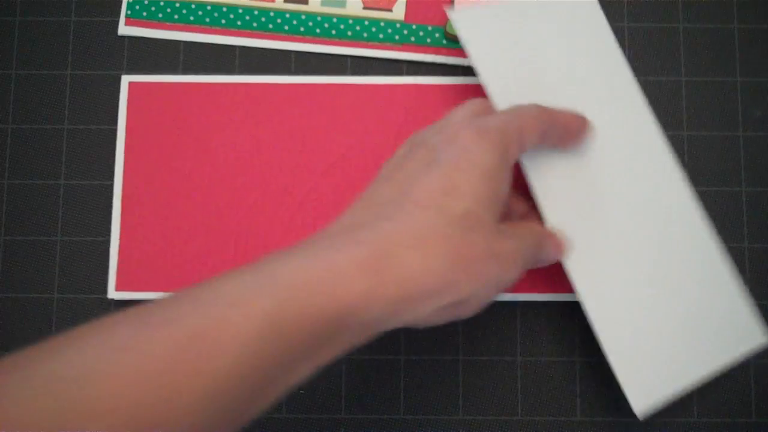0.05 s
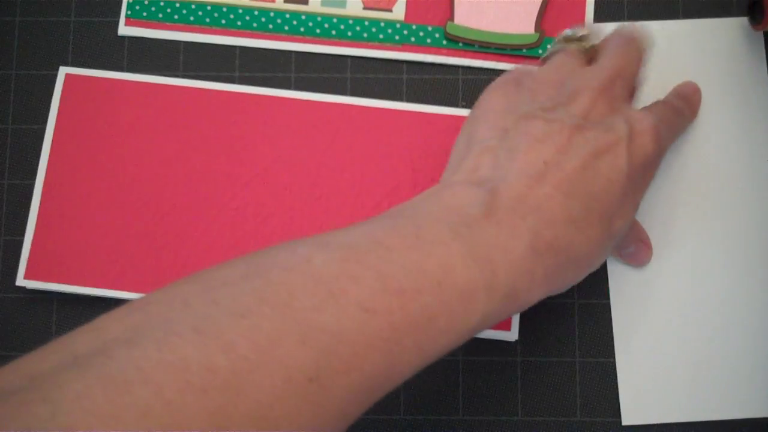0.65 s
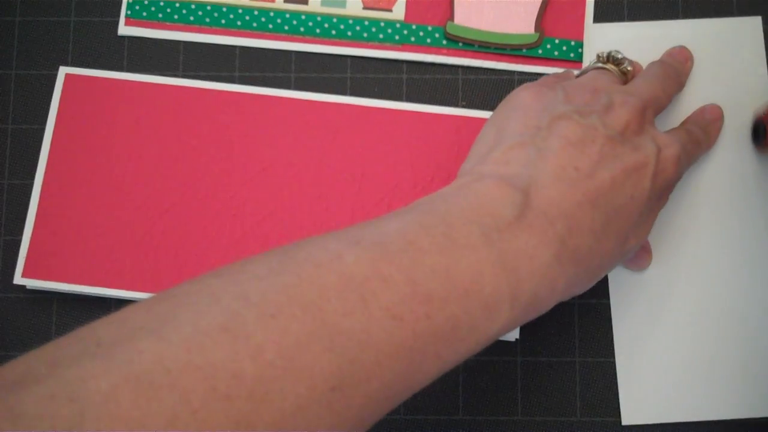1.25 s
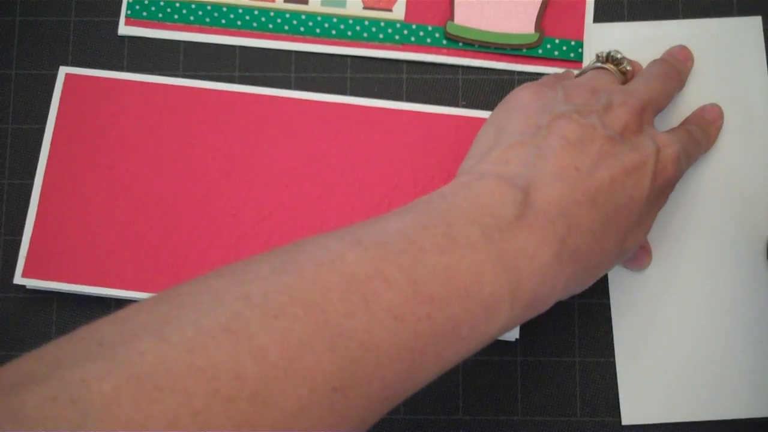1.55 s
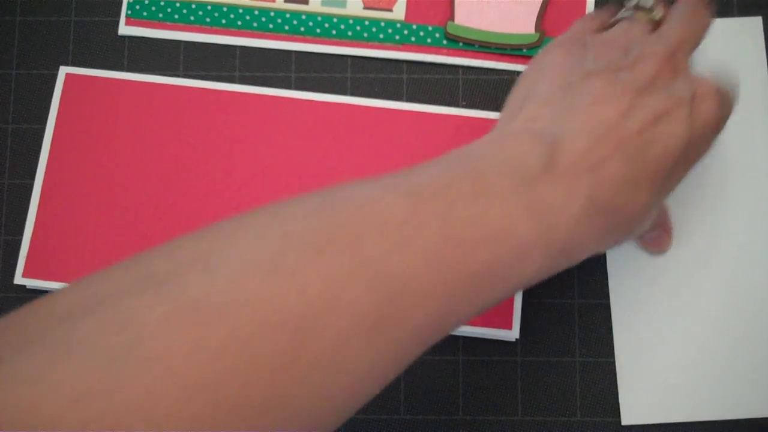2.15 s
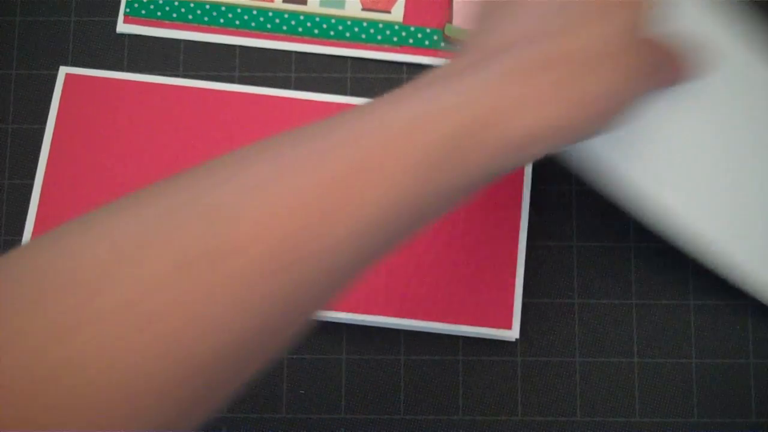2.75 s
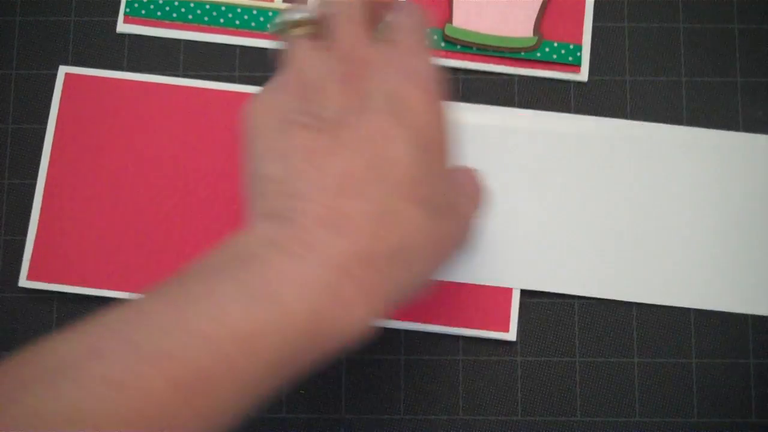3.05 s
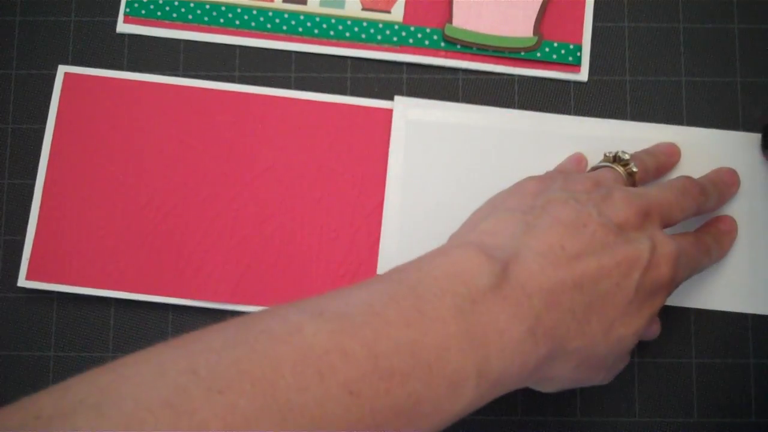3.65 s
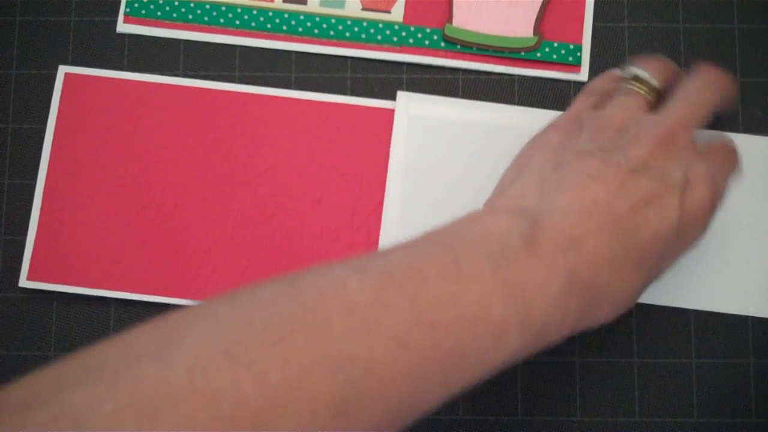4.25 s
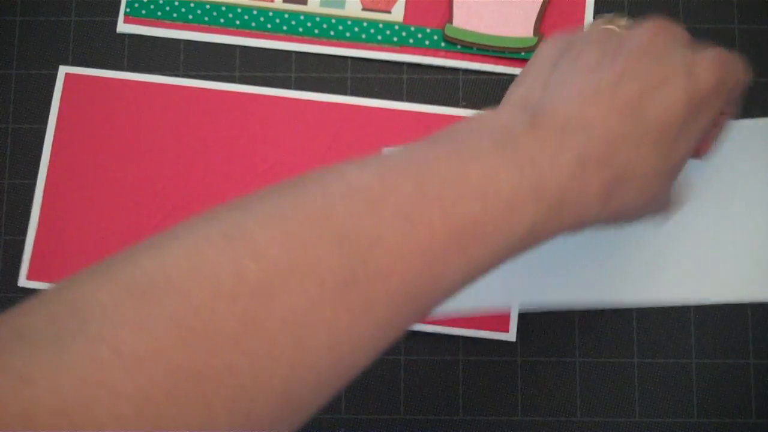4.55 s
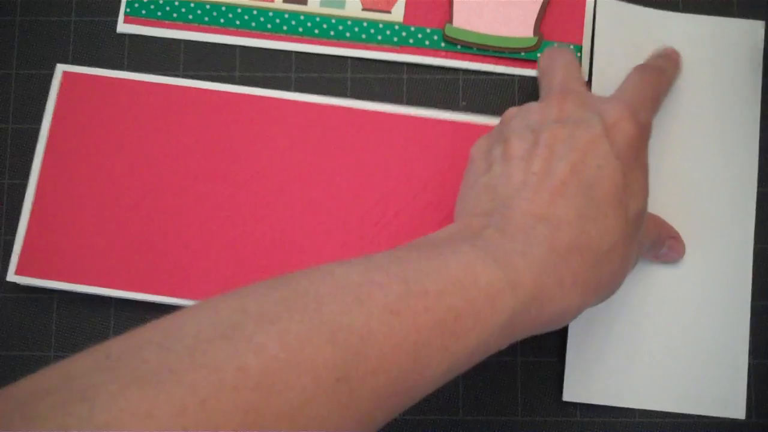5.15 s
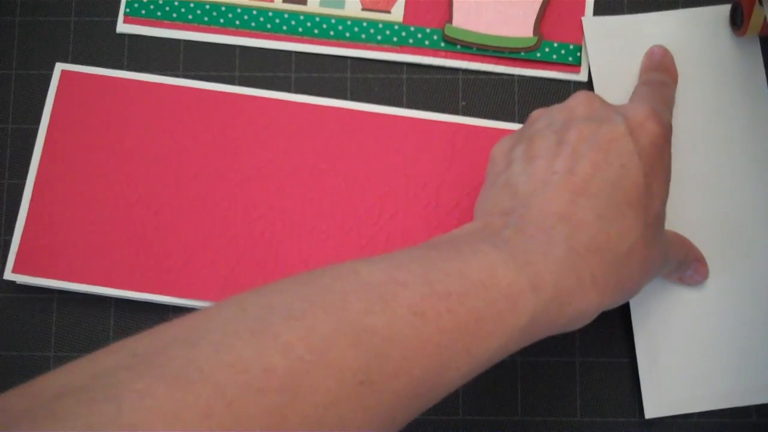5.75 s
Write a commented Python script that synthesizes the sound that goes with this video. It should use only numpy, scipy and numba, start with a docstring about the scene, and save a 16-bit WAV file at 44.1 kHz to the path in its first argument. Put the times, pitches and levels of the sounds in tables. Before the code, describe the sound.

A sheet of paper slides onto a card with a bright hiss and a sharp snap. Fingers rub it down with a dull, grainy scrub. The sheet swishes to a new position, is rubbed again, snaps loudly and is nudged along. Small crinkles and soft fingertip bumps on the table come in between. The sound is close and slightly to the right, in a small, quiet room.

```python
"""First comes the hiss of a sheet of paper sliding onto a card, with a sharp snap.
Fingers rub it down, it is moved, rubbed again and nudged along. The sheet hisses over a thin air gap and
buckles; skin catches and slips on it, and fingertips bump the craft table through it.
We listen in a small room, close to the table, through a pair of microphone ports, each with its own
treble resonance. The sheet lies to the right."""
import sys
import numpy as np
from scipy import signal
from scipy.fft import rfft, irfft
from scipy.io import wavfile
from numba import njit

SR = 44100
rng = np.random.default_rng(int(sys.argv[2]) if len(sys.argv) > 2 else 0)


def dump_mix(stems):
    """Bounce the given channels to the path in sys.argv[1] as a 16-bit WAV at rate SR."""
    frames = np.atleast_2d(stems).T  # one column per channel
    limited = np.clip(frames, -1, 1)  # hard clip at full scale
    pcm = np.round(limited * 32767).astype(np.int16)
    wavfile.write(sys.argv[1], SR, pcm)


N = 256220
T = np.arange(N) / SR


def undb(db):
    """Decibels to gain."""
    return 10 ** (np.asarray(db) / 20)


def unit(x):
    """Scale to rms 1."""
    return x / np.sqrt(np.mean(x ** 2))


def decay(t, t60):
    """A fade that loses 60 dB in t60."""
    return np.exp(-np.log(1000) * t / t60)


def walk(rate):
    """Smooth chance with spread 1 that changes about rate times a second."""
    return unit(np.interp(T * rate, np.arange(N), rng.standard_normal(N)))


def colour(x, points, size=4096):
    """Causal filter through (Hz, dB) points."""
    hz, db = np.transpose(points)
    f = np.maximum(np.fft.rfftfreq(size, 1 / SR), 1)
    cepstrum = irfft(np.log(undb(np.interp(np.log(f), np.log(hz), db))))
    cepstrum[1:size // 2] *= 2  # fold to minimum phase
    cepstrum[size // 2 + 1:] = 0
    response = irfft(np.exp(rfft(cepstrum)))
    return signal.fftconvolve(x, response[None], axes=1)[:, :x.shape[1]]


def wide(pair, half_hz):
    """Two unrelated signals become a broad source: alike at both ports in the bass, unlike higher up."""
    f = np.fft.rfftfreq(pair.shape[1], 1 / SR)
    angle = np.pi / 4 * f / (f + half_hz)
    mid, side = rfft(pair) * np.array([np.cos(angle), np.sin(angle)])
    return irfft(np.array([mid + side, mid - side]), pair.shape[1])


@njit
def resonance(x, hz, width_hz):
    """Moving state-variable filter: returns its band-pass and high-pass outputs."""
    band, high = np.empty_like(x), np.empty_like(x)
    for c in range(len(x)):
        band_state, low_state = 0., 0.
        for i in range(x.shape[1]):
            g, damping = np.tan(np.pi * hz[i] / SR), width_hz[i] / hz[i]
            v = (band_state + g * (x[c, i] - low_state)) / (1 + g * (g + damping))
            low = low_state + g * v
            band[c, i], high[c, i] = damping * v, x[c, i] - damping * v - low
            band_state, low_state = 2 * v - band_state, 2 * low - low_state
    return band, high


def friction(rate, scatter_db, smooth_db):
    """Fibres catch and let go: tiny slips of unequal size over a bed of countless smaller ones."""
    slips = (rng.random(N) < rate / SR) * undb(scatter_db * np.minimum(rng.exponential(size=N), 4))
    grain = unit(slips * rng.standard_normal((2, N)))
    return unit(grain + undb(smooth_db) * rng.standard_normal((2, N)))


def swell(peak_s, rise_s, fall_s, db, drop_db=12, shape=1.69):
    """Power of one hand movement: drop_db down one rise before and one fall after its peak."""
    away = np.abs(T - peak_s) / np.where(T < peak_s, rise_s, fall_s)
    return undb(db - np.minimum(drop_db * away ** shape, 200)) ** 2


# Room air and microphone hiss. Each row: frequency in Hz, relative level in dB.
AIR_SPECTRUM = [(25, -17), (90, -20), (120, -12), (190, -12.5), (500, -10), (700, -14), (900, -14),
                (1800, -16), (6200, -16.5), (10000, -21), (14000, -21.5)]

def room_tone(air_db=-58, whine_hz=580, whine_db=-74, rumble_db=-76):
    """The still room: air, microphone hiss, a faint steady whine and each port's own low rumble."""
    air = unit(colour(wide(rng.standard_normal((2, N)), half_hz=250), AIR_SPECTRUM))
    whine = np.sqrt(2) * np.sin(2 * np.pi * whine_hz * T + 0.62 * walk(rate=9.1))
    rumble_spectrum = [(25, -23), (70, -6.5), (150, -14), (400, -19), (2000, -62)]
    rumble = unit(colour(rng.standard_normal((2, N)), rumble_spectrum))
    return undb(air_db) * air + undb(whine_db) * whine + undb(rumble_db) * rumble


def small_room(x, early_db=-13, early_t60=0.065, late_db=-15, late_t60=0.32, first_s=0.00222):
    """Things on the table answer at once; the room adds a short tail. Both are duller than the source."""
    t = T[:SR // 2]
    response = 0
    for db, t60 in ((early_db, early_t60), (late_db, late_t60)):
        echoes = rng.standard_normal((2, len(t))) * decay(t, t60) * (t > first_s)
        response = response + undb(db) * echoes / np.sqrt(np.sum(echoes ** 2) / 2)
    echo_spectrum = [(100, 5), (600, 9.5), (2000, 2.5), (7000, -5.5), (14000, 0)]
    response = colour(wide(response, half_hz=2000), echo_spectrum)
    return x + signal.fftconvolve(x, response, axes=1)[:, :N]


# The left and right microphone ports. Each row: frequency in Hz, gain in dB.
LEFT_RESPONSE = [(100, 4.5), (1200, -1), (4000, 1), (5900, 4), (7250, 11), (8500, 4.5), (10000, 2.5),
                 (14000, -3.5)]
RIGHT_RESPONSE = [(100, 5), (1200, 0), (4200, 1), (6050, 12), (7000, 1.5), (8000, -3.5), (10000, -7),
                  (14000, -22)]

def microphone_ports(x, lag_ms=0.069):
    """Each port rings at its own treble pitch; the left, farther from the sheet, hears it later."""
    delay = np.exp(-2j * np.pi * np.fft.rfftfreq(N, 1000 / SR) * lag_ms)
    left = irfft(rfft(x[:1]) * delay, N)
    return np.vstack([colour(left, LEFT_RESPONSE), colour(x[1:], RIGHT_RESPONSE)])


# The table with its mat. Each row: mode frequency in Hz, relative level in dB, t60 in seconds.
TABLE_MODES = [(54.3, -30, .07), (112.1, -24, 0.16), (252, -18, 0.17), (326, -11.5, 0.12),
               (438, -14.5, 0.18), (603, -16, 0.091), (713, -7, 0.13), (808, -7.5, 0.15),
               (1221.5, -5.5, 0.054)]
# Its many damped modes, heard as a thud. Each row: frequency in Hz, relative level in dB.
THUD_SPECTRUM = [(40, -21), (100, -13.5), (200, -8), (330, -6), (700, -3.5), (1400, -6.5), (3000, -15),
                 (8000, -47)]
# Fingers landing. Each row: start in seconds, relative tap level in dB, contact time in ms,
# relative level of the following weight in dB.
LANDINGS = [(.166, -39.5, 0.85, -56), (.984, -37.5, 0.57, -33), (1.012, -52, 0.88, -36),
            (2.218, -35.5, 0.78, -32), (2.651, -42, 0.65, -51.5), (3.649, -35.5, 0.77, -21.5),
            (3.660, -40, 0.19, -46), (3.684, -54, 0.59, -30.5), (4.369, -38, 0.77, -56.5),
            (4.518, -38.5, 1, -51), (5.323, -39, 1.56, -43)]

def table_bumps(gain_db=-2, weight_ms=9, thud_db=-9, thud_t60=0.31, spot_db=6.5):
    """A fingertip taps the table's modes; the hand's slower weight sways only the lowest."""
    t, out = T[:SR // 2], np.zeros(N + SR)
    modes = np.array([(-1) ** k * undb(db) * np.sin(2 * np.pi * hz * t) * decay(t, t60)
                      for k, (hz, db, t60) in enumerate(TABLE_MODES)])
    for start, tap_db, contact_ms, weight_db in LANDINGS:
        at = int(start * SR)
        ring = undb(spot_db * rng.uniform(-1.1, 1, len(modes))) @ modes  # each spot favours other modes
        thud = unit(colour(rng.standard_normal((1, len(t))), THUD_SPECTRUM)[0]) * decay(t, thud_t60)
        for db, ms in ((tap_db, contact_ms), (weight_db, weight_ms)):
            push = np.hanning(int(ms * SR / 1000) + 3)
            knock = signal.fftconvolve(ring + undb(thud_db) * thud, push / push.sum())
            out[at:at + len(knock)] += undb(db) * knock
    return undb(gain_db) * out[:N]


def stand_shake(gain_db=-28, t60=0.26, top_hz=110):
    """The weight of each landing shakes the microphone stand: a short rumble, different at each port."""
    jolt = sum(undb(weight_db) * (T > start) * decay(np.abs(T - start), t60)
               for start, _, _, weight_db in LANDINGS)
    lowpass = signal.butter(3, top_hz, fs=SR, output="sos")
    rumble = signal.sosfilt(lowpass, rng.standard_normal((2, N)) * jolt)
    return undb(gain_db) * rumble * np.sqrt(SR / 2 / top_hz)


# The bowed sheet ringing as it drags. Each row: start and end in seconds, first and last pitch in Hz,
# level in dB.
CHATTERS = [(0.581, .671, 1920, 2080, -45), (2.649, 2.692, 2680, 2610, -42),
            (2.707, 2.759, 5800, 5560, -34.5), (3.013, 3.059, 1750, 1900, -36),
            (3.042, 3.124, 5460, 5300, -39), (4.68, 4.71, 2776, 2720, -40.5),
            (5.031, 5.202, 2670, 3550, -48.5), (5.323, 5.7, 3840, 2830, -52)]

def ringing_sheet(width_hz=550.):
    """The dragged sheet chatters in narrow bands whose pitch slides as its bend changes."""
    out = np.zeros((2, N))
    for start, end, first_hz, last_hz, db in CHATTERS:
        at, n = int(start * SR), int((end - start) * SR)
        hz, width = np.linspace(first_hz, last_hz, n), np.full(n, width_hz)
        tone = rng.standard_normal((2, n))
        for _ in range(2):
            tone = resonance(tone, hz, width)[0]
        arch = np.sqrt(np.sin(np.pi * np.arange(n) / n))
        out[:, at:at + n] += unit(tone) * undb(db) * arch
    return wide(out, half_hz=12030)


# Fingers gripping or letting go. Each row: firmest moment, rise and fall in seconds, strength in dB.
FINGER_BRUSHES = [(.005, .02, 0.036, -39.5), (2.238, 0.0196, 0.037, -36), (2.475, 0.027, 0.034, -49.5),
                  (2.555, 0.038, 0.038, -47.5), (4.405, 0.011, 0.015, -39), (4.525, 0.0187, 0.023, -52),
                  (4.877, 0.017, 0.009, -46), (4.985, 0.024, 0.046, -48)]
# Two long rubs that press the sheet down, a list for each.
# Each row: time in seconds, strength in dB, resonance of the pressed patch in Hz.
LONG_RUBS = [
    [(1.12, -70, 1154), (1.202, -45, 867), (1.304, -28.5, 1006), (1.372, -36.5, 958), (1.724, -36.5, 664.4),
     (1.822, -36, 784), (1.87, -31, 600.6), (1.894, -40, 665), (2.028, -36.5, 667), (2.096, -50, 865),
     (2.162, -51, 566), (2.19, -60, 636)],
    [(3.8, -75, 722), (3.834, -53.5, 783), (3.882, -50.5, 784), (3.974, -30, 946), (4.03, -35.5, 960),
     (4.082, -28, 731), (4.118, -35.5, 666), (4.13, -28, 687), (4.168, -42.5, 922), (4.19, -43, 820),
     (4.25, -49, 1081), (4.3, -53, 820)],
]

def finger_motion(brush_hz=800., fade_s=0.027):
    """Strength of the scrub and pitch of the pressed patch, which follows the fingers' place on the card."""
    power = sum(swell(*brush) for brush in FINGER_BRUSHES)
    patch_hz = np.full(N, brush_hz)
    for rub in LONG_RUBS:
        times, db, hz = np.transpose(rub)
        first, last = times[0], times[-1]
        contact = np.interp(T, [first - fade_s, first, last, last + fade_s], [0, 1, 1, 0])
        power = power + contact * undb(np.interp(T, times, db)) ** 2
        patch_hz = patch_hz + contact * (np.interp(T, times, hz) - patch_hz)
    return np.sqrt(power), patch_hz


# The dull scrub and the hiss of skin on paper, close up. Each row: frequency in Hz, relative level in dB.
SCRUB_SPECTRUM = [(60, -37), (125, -23), (200, -22), (330, -12.5), (450, -1), (600, -7), (720, -3),
                  (850, -5.5), (1050, -4), (1350, -1), (2100, -13), (3400, -19), (4500, -16.5), (7000, -40)]
SKIN_SPECTRUM = [(500, -13), (2200, 4), (4000, -1), (7000, -0.5), (10000, -7), (14500, -6)]

def rubbing_fingers(press, patch_hz, scrub_db=-2, skin_db=-5.5, judder_db=2.1, pivot_db=-41.5):
    """Skin sticks and slips on the pressed sheet: a grainy scrub with fine crackle on top."""
    scrub = colour(wide(friction(rate=700, scatter_db=2.5, smooth_db=-0.5), half_hz=3500), SCRUB_SPECTRUM)
    patch_ring = resonance(scrub, patch_hz, 0.79 * patch_hz)[0]
    scrub = unit(scrub + patch_ring)
    skin_slips = wide(friction(rate=1200, scatter_db=3.5, smooth_db=0.5), half_hz=3430)
    skin = unit(colour(skin_slips, SKIN_SPECTRUM))
    # skin hiss grows only 0.64 dB per dB of scrub, so a light touch is brighter
    graze = undb(pivot_db) * (press / undb(pivot_db)) ** 0.64
    judder = undb(judder_db * walk(rate=140))
    return judder * (undb(scrub_db) * press * scrub + undb(skin_db) * graze * skin)


def crinkles(strength, per_s=13, relative_db=-4, scatter_db=3, low_hz=1490, high_hz=7550, t60_ms=14):
    """Rows for snaps(): small buckles at random moments, as strong as the sheet is being handled."""
    when, pitch, size = rng.random((int(per_s * N / SR), 3)).T
    at = (when * N).astype(int)
    levels = 20 * np.log10(strength[at]) + relative_db + scatter_db * (2 * size - 1)
    pitches = low_hz * (high_hz / low_hz) ** pitch
    return [(start, db, hz, db, t60_ms) for start, db, hz in zip(T[at], levels, pitches)]


# A crack of paper fibres. Each row: frequency in Hz, gain in dB.
CRACK_SPECTRUM = [(40, -36.5), (300, -23), (800, -8), (1600, 3), (4000, 5), (7000, 0.5), (10000, -8.5),
                  (14500, -12)]
# Sharp snaps and ticks: the sheet buckling, its edge striking, or a fingertip catching.
# Each row: start in seconds, ring level in dB, ring pitch in Hz, relative crack level in dB, its t60 in ms.
SNAPS = [ (.1432, -30, 5800, -31, 60), (.1656, -8, 4720, -11, 36), (.177, -22, 1670, -38, 25),
         (.359, -27.5, 1455, -30, 27.5), (.572, -20.5, 6710, -17, 6.9), (.95, -34.5, 7570, -51, 46),
         (.984, -45, 2230, -45, 27), (1.272, -28, 1210, -49.5, 14), (1.297, -19.5, 1380, -28, 30),
         (1.516, -26, 1315, -27, 11), (1.552, -25, 6400, -41, 6), (1.814, -25, 932, -34, 11),
         (2.058, -31.5, 4020, -35, 57), (2.217, -29, 1310, -36, 18), (2.2455, -40, 5300, -27, 16),
         (2.4732, -23, 7340, -37, 6), (2.649, -12, 5600, -11, 19), (2.6509, -2, 2695, -8, 13),
         (2.9295, -25, 6400, -22.5, 22), (3.133, -27, 1590, -25, 12), (3.1497, -30, 3470, -27, 7.3),
         (3.159, -29, 2620, -30, 13), (3.2155, -31, 9060, -42, 3.9), (3.3607, -41, 9050, -41, 11),
         (3.489, -30, 7540, -32, 7), (3.5295, -35, 5905, -30, 15), (3.655, -54, 6350, -36, 40),
         (3.834, -42, 1510, -43.5, 25), (3.862, -50, 6030, -33.5, 19), (3.9232, -30, 6380, -24.5, 16),
         (3.955, -23, 1702, -40, 13), (4.071, -18.5, 1580, -30, 55), (4.078, -15, 1830, -20, 27),
         (4.128, -30, 1060, -28.5, 18), (4.2031, -29.5, 1570, -26.5, 31), (4.3027, -24.5, 7100, -39, 8),
         (4.353, -12.5, 6100, -24, 3.5), (4.3582, -5, 6000, -13.5, 18), (4.3647, -23, 6340, -18.5, 26),
         (4.3688, 0.5, 7450, -9, 7.7), (4.8061, -17, 6100, -23, 14), (4.9625, -33, 2600, -30.5, 14),
         (4.981, -24.5, 6240, -39, 6.9), (5.3233, -15, 6050, -20, 19)]

def snaps(rows, crack_gain_db=-2, rise_ms=0.14, waver=0.0978, waver_ms=0.39, size=4096):
    """Each snap rings a small patch of the sheet, unsteady in pitch, and sets off a crack of fibres."""
    rings, cracks = np.zeros((2, 2, N + size))
    ms = 1000 * np.arange(size) / SR
    for start, ring_db, hz, crack_db, crack_ms in rows:
        at = slice(int(start * SR), int(start * SR) + size)
        ring_ms = 23.4 * (1500 / hz) ** 0.83  # higher patches die sooner
        wobble = np.interp(ms / waver_ms, np.arange(size), rng.standard_normal(size))
        pitch = hz * (1 + waver * wobble)
        swing = np.sin(2 * np.pi * np.cumsum(pitch) / SR) * (1 - np.exp(-ms / rise_ms))
        rings[:, at] += undb(ring_db) * swing * decay(ms, ring_ms)
        cracks[:, at] += undb(crack_db) * rng.standard_normal((2, size)) * decay(ms, crack_ms)
    cracks = colour(wide(cracks[:, :N], half_hz=12000), CRACK_SPECTRUM)
    return rings[:, :N] + undb(crack_gain_db) * cracks


def flexing(x, centres_hz, drift, width, depth, rate):
    """Resonances that wander and come and go as the paper bends under the hand."""
    out = x
    for centre_hz in centres_hz:
        hz = np.minimum(centre_hz * np.exp(drift * walk(rate)), .4 * SR)
        out = out + depth * walk(rate) * resonance(x, hz, width * hz)[0]
    return unit(out)


# Pushes of the sheet across the table. Each row: fastest moment, rise and fall in seconds,
# strength in dB, relative level of the sheet's body in dB, nominal air-gap pitch in Hz.
PUSHES = [ (.06, 0.13, 0.31, -43.5, -14.5, 1450), (0.189, 0.042, 0.1, -30.5, -3.5, 1760),
          (0.282, 0.0398, 0.041, -21, -11, 2322), (.345, 0.062, 0.045, -33, -3.5, 1980),
          (.48, 0.074, 0.053, -35.5, -1, 2135), (0.564, .042, 0.071, -26.5, -6, 2370),
          (1.06, 0.023, 0.041, -52, -24, 1990), (2.345, .04, 0.036, -51, -7.5, 2010),
          (2.412, 0.019, 0.025, -38, -24, 2090), (2.462, 0.019, 0.016, -32, -15, 1850),
          (2.578, 0.055, .055, -42.5, -6.5, 1983), (2.67, 0.049, 0.059, -32, -4, 2580),
          (2.765, 0.053, 0.073, -28.5, -5, 2290), (2.915, 0.0177, 0.022, -37.5, -4, 2200),
          (2.942, 0.019, 0.054, -28.5, -4, 2330), (2.995, 0.064, 0.059, -27.5, -2, 2400),
          (3.079, 0.063, 0.078, -35.5, -4.5, 1870), (3.51, 0.02, 0.061, -46, -9, 2370),
          (4.32, .035, 0.053, -43, -10.5, 1572), (4.39, 0.036, 0.061, -40.5, -6.5, 1145),
          (4.524, .025, 0.057, -41, -2, 1700), (4.63, 0.065, .045, -39, -5, 2390),
          (4.77, 0.076, 0.047, -31, -3, 2124), (4.819, 0.02, 0.0329, -23, -9, 2157),
          (4.87, .03, 0.095, -47, -5.5, 1590), (4.995, .032, 0.032, -34, -4.5, 2126),
          (5.07, 0.052, .03, -46.5, -3, 2680), (5.113, 0.022, 0.018, -32, -4, 2817),
          (5.168, 0.047, 0.063, -37, -4.5, 3052), (5.315, 0.076, 0.1, -37.5, -10, 2200),
          (5.485, 0.089, .15, -38.5, -9, 2570), (5.654, 0.057, 0.05, -40.5, -6, 2750),
          (5.785, 0.048, 0.042, -59.5, -9, 2000)]

def sheet_motion():
    """Strength of the drag, level of the body and air-gap pitch; overlapping pushes blend by power."""
    power = np.array([swell(*push[:4]) for push in PUSHES])
    total = power.sum(axis=0)
    body_db, gap_hz = np.array(PUSHES)[:, 4:].T @ power / total
    return np.sqrt(total), body_db, gap_hz


# Paper on the mat and the sheet's own body, close up. Each row: frequency in Hz, relative level in dB.
HISS_SPECTRUM = [(150, -34.5), (800, -20.5), (2500, -10.5), (4000, -3.5), (5500, 1), (7500, 2.5),
                 (10000, -7), (14500, -9.5)]
BODY_SPECTRUM = [(500, 11), (1800, 1.5), (3200, -1), (4500, 0), (7000, -21.5), (14000, -34.5)]

def sliding_sheet(drag, body_db, gap_hz, hiss_db=-4, body_trim_db=-0.45, judder_db=1.5):
    """Paper hisses on the mat; the air gap under it cancels the lows and rings just above that edge."""
    hiss = colour(wide(friction(rate=3000, scatter_db=-0.5, smooth_db=2.5), half_hz=4000), HISS_SPECTRUM)
    hiss = flexing(hiss, (4400, 5050, 6380, 8080), drift=0.064, width=0.051, depth=0.52, rate=14)
    body = colour(wide(friction(rate=2000, scatter_db=5.5, smooth_db=5.5), half_hz=5000), BODY_SPECTRUM)
    edge_hz = 0.73 * gap_hz
    for _ in range(2):
        body = resonance(body, edge_hz, edge_hz)[1]  # high-pass
    body = flexing(body, (1600, 2300, 3300), drift=0.1534, width=0.074, depth=0.7, rate=12)
    judder = undb(judder_db * walk(rate=160))
    return drag * judder * (undb(hiss_db) * hiss + undb(body_trim_db + body_db) * body)


def scene():
    """The work at the table, heard from close by through both ports, over the quiet of the room."""
    drag, body_db, gap_hz = sheet_motion()
    press, patch_hz = finger_motion()
    paper = sliding_sheet(drag, body_db, gap_hz) + ringing_sheet()
    fingers = rubbing_fingers(press, patch_hz) + table_bumps()
    snapping = snaps(SNAPS + crinkles(drag + press))
    return microphone_ports(small_room(paper + fingers + snapping)) + room_tone() + stand_shake()


def record(dry, ceiling=0.69, top_hz=14300):
    """The sharpest snaps overload slightly; the top is cut steeply."""
    lowpass = signal.ellip(10, .2, 70, top_hz, fs=SR, output="sos")
    return signal.sosfilt(lowpass, np.clip(dry, -ceiling, ceiling))


dry = scene()
out = record(dry)
dump_mix(out)
```